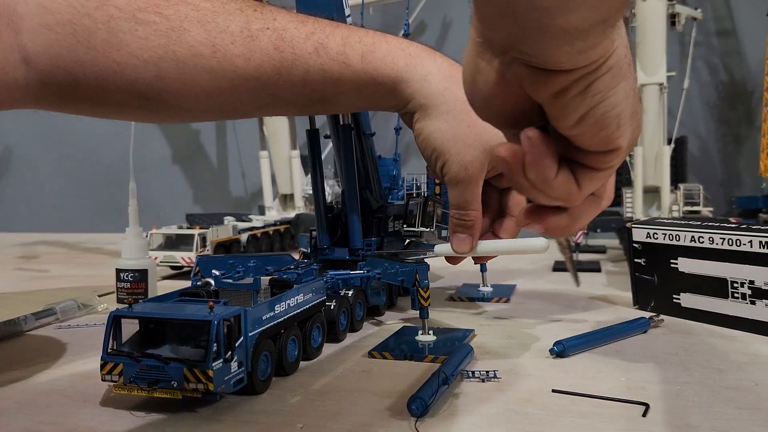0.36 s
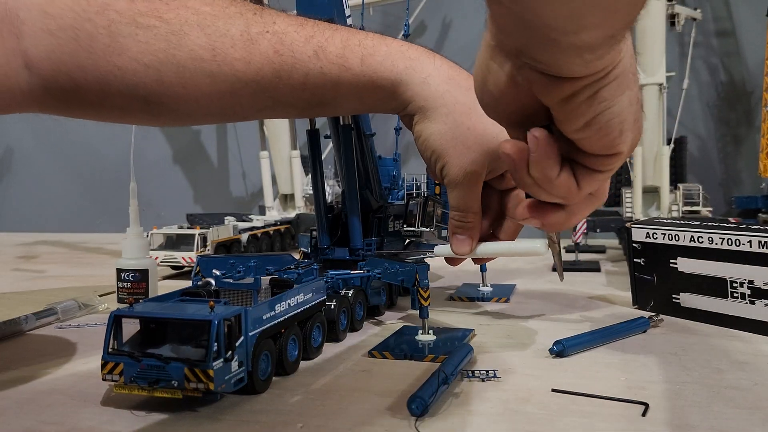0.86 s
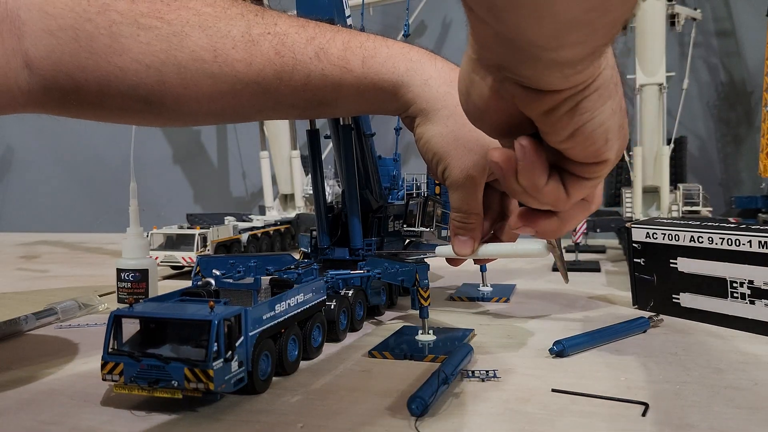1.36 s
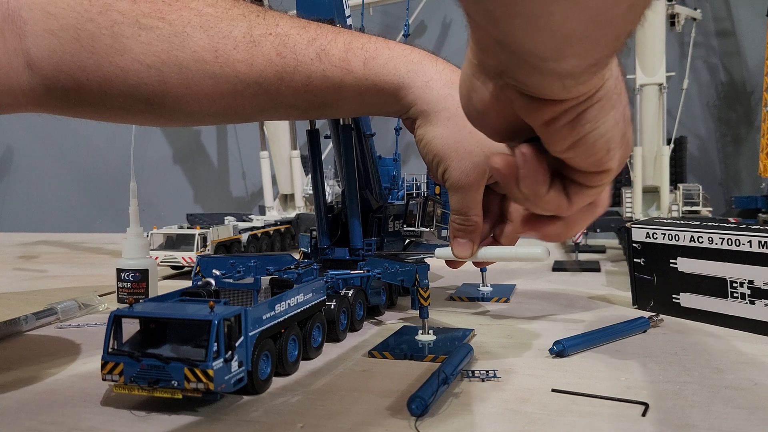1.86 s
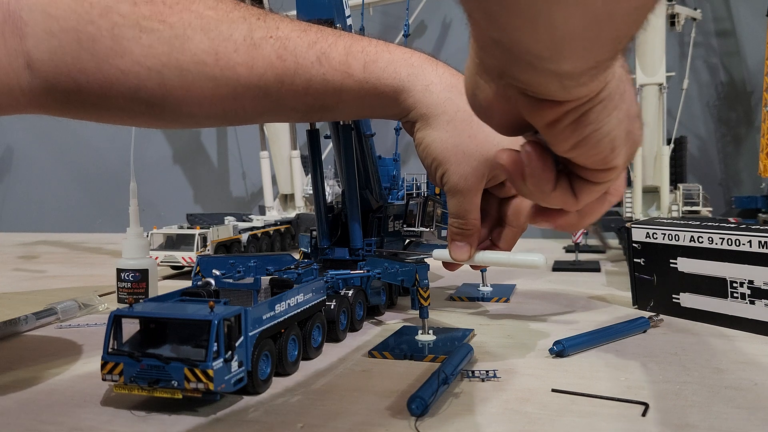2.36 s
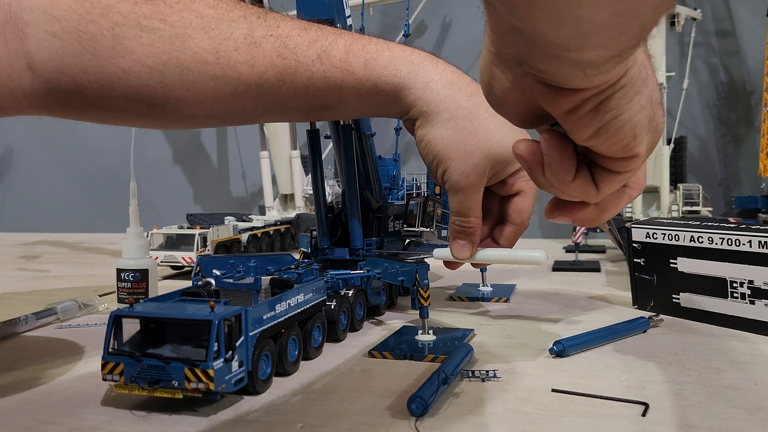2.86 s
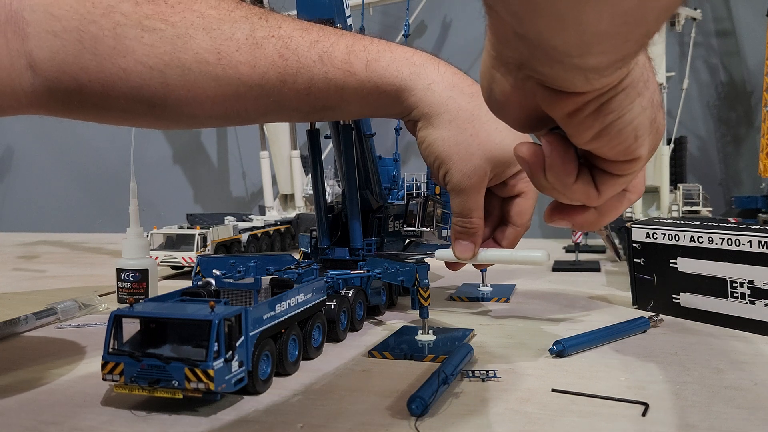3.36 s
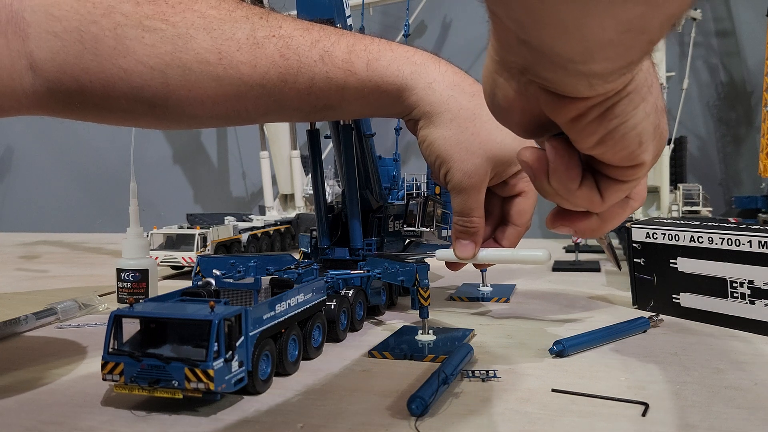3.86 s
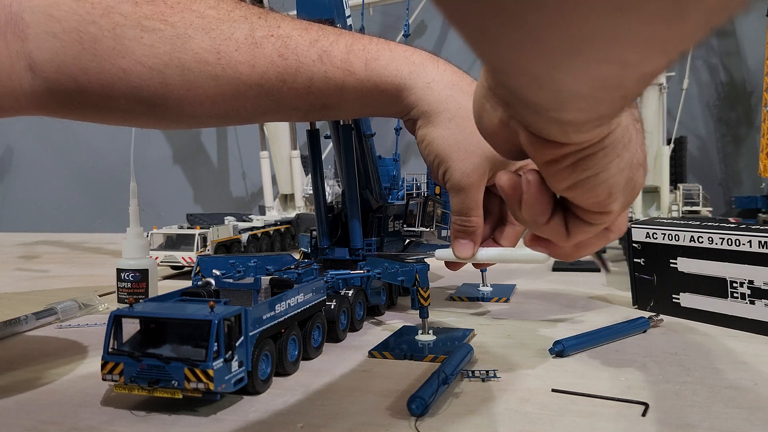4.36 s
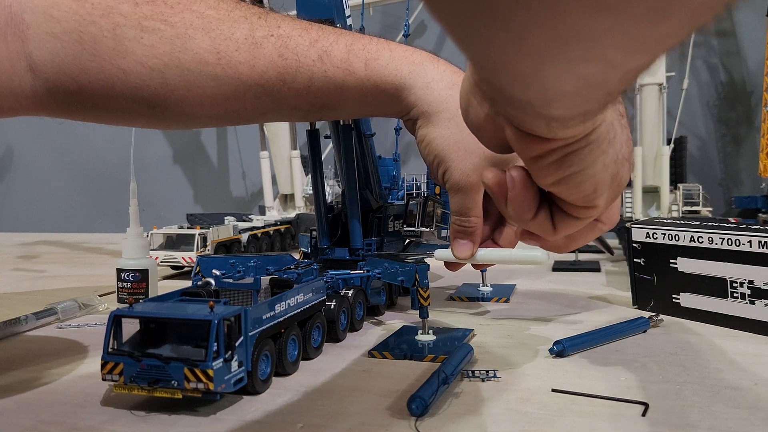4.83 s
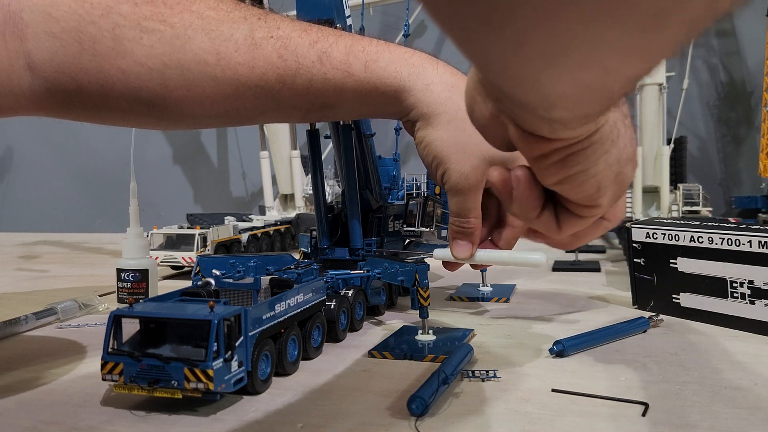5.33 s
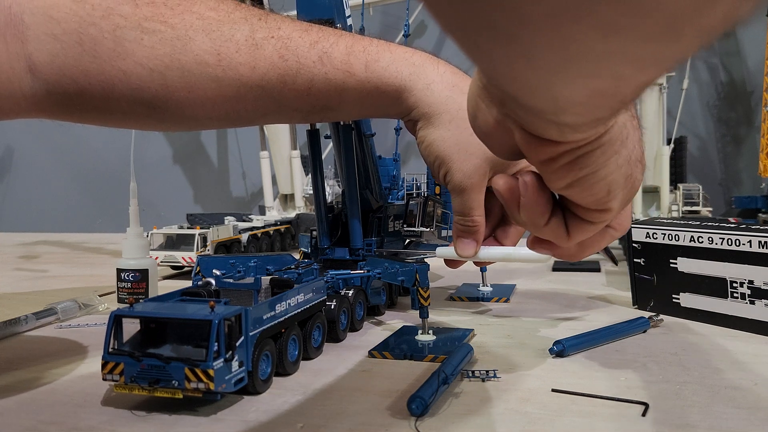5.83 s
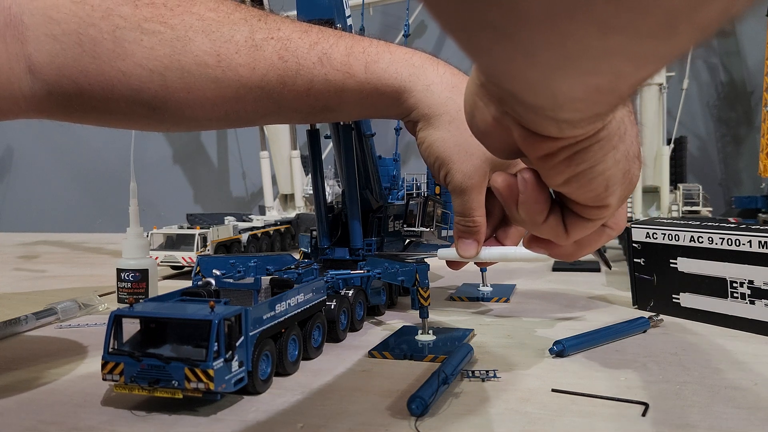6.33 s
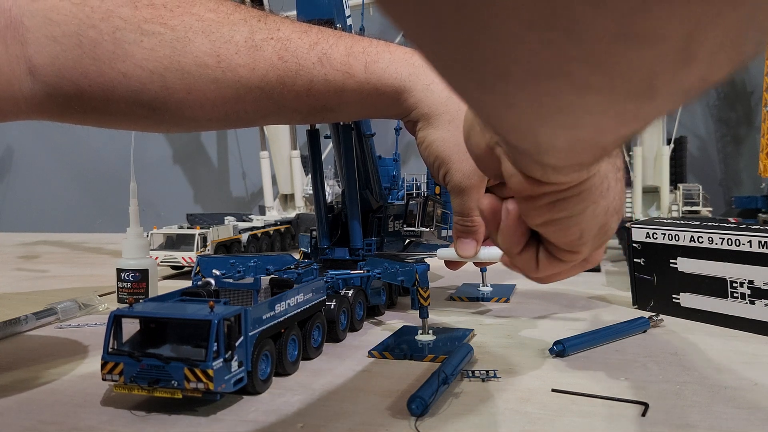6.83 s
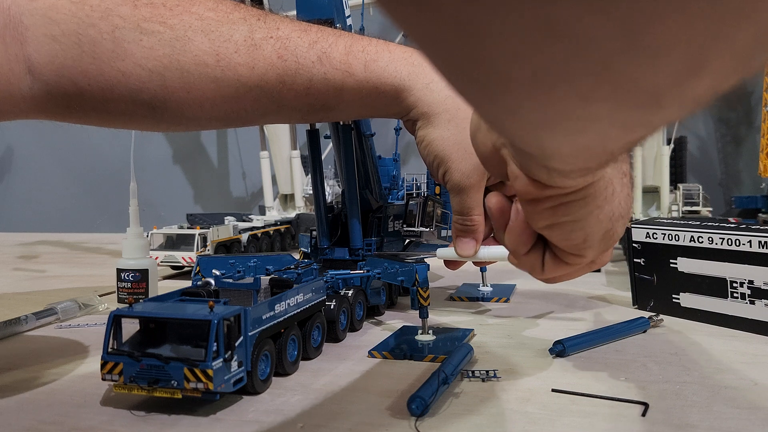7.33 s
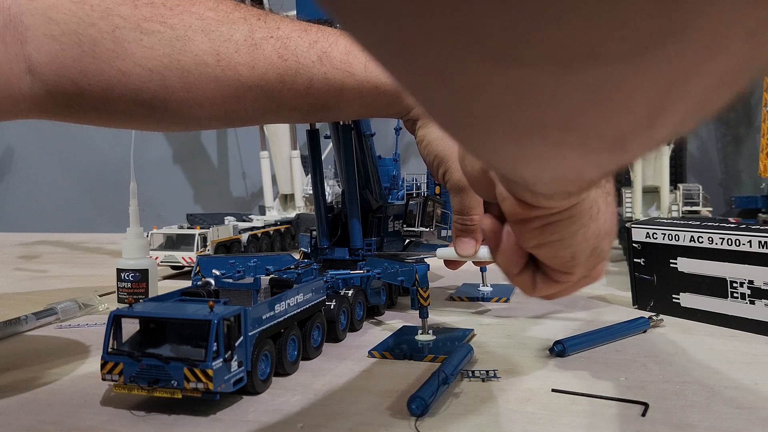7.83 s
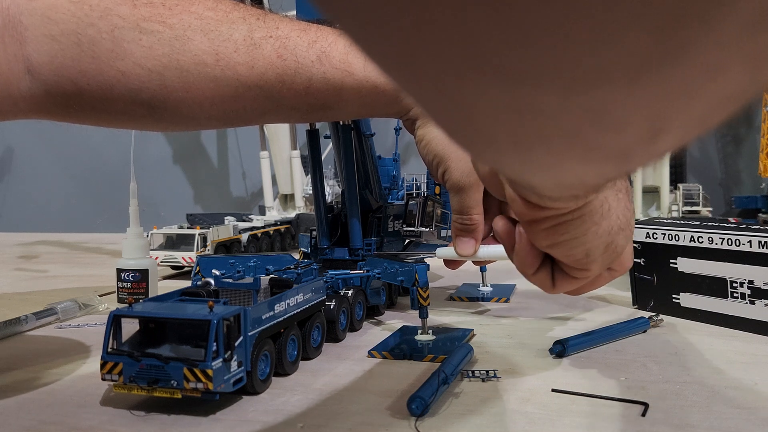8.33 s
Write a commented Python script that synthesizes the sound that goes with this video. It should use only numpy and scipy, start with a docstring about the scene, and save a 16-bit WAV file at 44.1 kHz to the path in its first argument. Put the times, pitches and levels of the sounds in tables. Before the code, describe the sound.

Light hammering on a small metal pin, recorded near in a reverberant workshop. Dry, bright clicks with a short metallic rattle and soft woody thud come in runs about a fifth of a second apart, separated by near-quiet gaps with tiny contact ticks. Low drifting room drone and thin hiss lie far below. The last two blows are firm and heavy.

```python
"""Distant rumble, drone and faint hiss come first and lie below everything, as drifting bands of noise.
Then a small steel tool touches and scuffs the parts of a die-cast model: light ticks ring nearby modes.
Soon it taps a metal pin into the model's mount: each blow rattles for a few milliseconds, rings the metal
and thumps the bench, whose low modes swell. Half a second of dense echoes from the workshop answers.
Runs of blows and light contacts go on by turns until the end."""
import sys
import numpy as np
from scipy import signal
from scipy.fft import rfft, irfft, next_fast_len
from scipy.io import wavfile

SR = 44100
rng = np.random.default_rng(int(sys.argv[2]) if len(sys.argv) > 2 else 0)


def master_out(mix):
    """Clip the mix to full scale and print it as 16-bit PCM to the path in sys.argv[1]."""
    frames = np.transpose(np.atleast_2d(mix))
    ceiling = np.clip(frames, -1, 1)
    pcm = np.round(ceiling * 32767).astype(np.int16)
    wavfile.write(sys.argv[1], SR, pcm)


def field_ratio(decibels):
    """Amplitude ratio for a level in dB (20 dB per decade); scalars and array-likes work."""
    return 10 ** (np.asarray(decibels, dtype=float) / 20)


N = 372204
CONTACT_SAMPLES = 4096   # room for the sound of one contact
WAYS = 5   # directions of radiation: two toward the microphones, the others toward the walls


def rms_one(x, count=None):
    """Scales the last two axes together to rms 1 over the first samples."""
    return x / np.sqrt(np.mean(x[..., :count] ** 2, axis=(-1, -2), keepdims=True) + 1e-20)


def at_hz(points, hz, axis=1):
    """Reads a column of a table along log frequency."""
    points = np.array(points)
    return np.interp(np.log(hz), np.log(points[:, 0]), points[:, axis])


def ring(push, hz, t60):
    """A two-pole resonator: a unit click sets a dying sine of starting height 1 ringing."""
    radius = field_ratio(-60 / (t60 * SR))
    turn = 2 * np.pi * hz / SR
    return signal.lfilter([0, np.sin(turn)], [1, -2 * radius * np.cos(turn), radius * radius], push + 1e-18)


def band(x, low_hz, high_hz):
    """Butterworth band-pass."""
    edges_hz = [low_hz, min(high_hz, .45 * SR)]
    return signal.sosfilt(signal.butter(2, edges_hz, "band", fs=SR, output="sos"), x)


def drift(quickness):
    """Smoothed chance with a spread of 1; a higher quickness makes it wander faster."""
    knots = rng.standard_normal(int(N / SR * 40))
    slow = signal.lfilter([1], [1, -np.exp(-quickness / 6.4)], knots)
    return np.interp(np.arange(N) / SR * 39, np.arange(len(slow)), slow / slow.std())


# how alike left and right are: (f/Hz, likeness; below 0 counts as 0)
LEFT_RIGHT_LIKENESS = [(60, 0.985), (130, 0.95), (240, 0.5), (500, 0.5), (950, 0.15), (3770, -0.22),
                       (15000, -0.04)]


def stereo_noise(mid, side, hz):
    """Two independent noises make a left-right pair, as alike as the table says at this frequency."""
    alike = np.clip(at_hz(LEFT_RIGHT_LIKENESS, hz), 0, 1)
    return np.sqrt(1 + alike) * mid + np.sqrt(1 - alike) * side * [[1], [-1]]


# background tone color, relative within each layer: (f/Hz, level/dB per Hz)
AIR_SPECTRUM = [(25, -5), (80, -1.5), (124, -6), (250, -26.5), (389, -9), (687, -25.5), (1120, -30.5),
                (3150, -36), (6000, -40.5), (8300, -39.5), (9500, -47), (15200, -47), (16500, -52)]
# how busy the background is, as the level of its drone: (t/s, level/dB)
DRONE_LEVEL = [(0, -74), (.35, -71), (.8, -74.5), (2.6, -71), (2.9, -76), (3.3, -79.5), (3.55, -73.5),
               (4.1, -77), (5.65, -80), (5.9, -73), (6.15, -78), (6.8, -79), (8.44, -73.5)]
# brief swells of the boom: (t/s, rise in level/dB)
BOOM_SWELLS = [(2.82, 9), (3.35, 6), (5.9, 10), (6.45, 4.5)]


def background():
    """Third-octave noise bands flicker; the boom swells now and then, drone and hiss rise together."""
    rumble_db, boom_db, hiss_db = -65.5, -75, -79.5
    hiss_follows = 0.7   # dB per dB of drone
    swell_s, patchy_db = 0.13, 4.5
    t = np.arange(N) / SR
    drone_db = np.interp(t, *np.transpose(DRONE_LEVEL))
    boom_db = boom_db + sum(rise * np.exp(-((t - s) / swell_s) ** 2) for s, rise in BOOM_SWELLS)
    hiss_db = hiss_db + hiss_follows * (drone_db - drone_db.mean())
    levels = [rumble_db, boom_db, drone_db, hiss_db]
    white = rng.standard_normal((2, 2, N))
    edges = 25 * 2 ** np.arange(0, 9.4, 1 / 3)
    layers = [0, 0, 0, 0]
    for k, (low, high) in enumerate(zip(edges, edges[1:])):
        hz = np.sqrt(low * high)
        mid, side = band(white[k % 2], low, high)
        flicker_db = patchy_db * (hz / 100) ** -.3 * drift(4.9)   # the lows wander most
        layer = int(hz > 105) + int(hz > 250) + int(hz > 800)
        layers[layer] = layers[layer] + stereo_noise(mid, side, hz) * field_ratio(at_hz(AIR_SPECTRUM, hz) + flicker_db)
    mix = sum(rms_one(layer) * field_ratio(db) for layer, db in zip(layers, levels))
    return mix * field_ratio([[.5], [-.5]])   # a touch to the left


def port_hiss():
    """The microphone port gathers steady hiss around its resonance, independent left and right."""
    low_hz, high_hz, level_db = 6900, 8400, -85.5
    hiss = band(rng.standard_normal((2, N)), low_hz, high_hz)
    return field_ratio(level_db) * rms_one(band(hiss, low_hz, high_hz))   # twice through for steeper sides


def rattle(length_s, spiky_db, alike, settle_db):
    """Tool, pin and loose parts chatter: uneven clicks, then a fainter settling."""
    t = np.arange(CONTACT_SAMPLES) / SR
    spikes_db = spiky_db * rng.standard_normal((len(length_s), 1, CONTACT_SAMPLES))
    clicks = rng.standard_normal((len(length_s), WAYS + 1, CONTACT_SAMPLES)) * field_ratio(spikes_db)
    # the two microphones share part of the clicks; the walls get their own
    share = np.clip(alike, 0, 1)
    clicks[:, :2] = np.sqrt(share) * clicks[:, -1:] + np.sqrt(1 - share) * clicks[:, :2]
    contact = np.exp(-(t / np.abs(length_s)[:, None, None]) ** 1.6)
    settling = field_ratio(settle_db) * np.exp(-t / 0.018 - (t / 0.019) ** 4)   # comes to rest rather suddenly
    onset = 1 - np.exp(-t / 0.00039)
    return clicks[:, :WAYS] * onset * (contact + settling)


def place(times, sounds, lag=0):
    """Lays each sound at its time; the right microphone hears it lag samples later."""
    out = np.zeros((WAYS, N + CONTACT_SAMPLES))
    for s, sound in zip(times, sounds):
        start = round(s * SR)
        out[:, start:start + CONTACT_SAMPLES] += sound * np.linspace(1, 0, CONTACT_SAMPLES)
    out[1] = np.roll(out[1], lag)
    return out[:, :N]


# modes of model, mount and pin: (f/Hz, relative level/dB, t60/s)
METAL_MODES = [(436, -4, 0.07), (470, -2, 0.02), (570, 0, 0.062), (674.3, -7, 0.11), (854, 3.5, 0.046),
               (1020, -10, 0.036), (1053, -7, 0.091), (1235, -4, 0.054), (1390, -4, 0.04), (1640, 0, 0.031),
               (2026, 1, 0.028), (2100, -4.5, .06), (2140, -11.5, 0.27), (2296, -3.5, .05),
               (2660, -15, 0.055), (3020, -6.5, .018), (3800, -2, .015), (4040, -2, .012), (4400, 1, 0.025),
               (4800, 0, .015), (5500, -5.5, 0.013), (5710, -7, .015), (6400, -3, 0.04), (6780, -3.5, .02),
               (7250, -1, .015), (7780, -17.5, .015), (9700, -16.5, 0.0055), (13300, -5.5, 0.0027),
               (15000, -8, 0.005)]


def rung(chatter, strengths_db, low, high):
    """Chatter drives the metal modes from low up to high, each with a strength of its own."""
    total = 0
    for k, (hz, db, t60) in enumerate(METAL_MODES):
        if low <= hz < high:
            total = total + field_ratio(db + strengths_db[:, k]) * ring(chatter, hz, t60)
    return rms_one(total, count=400)


# light contacts and rebounds: (t/s, tick level/dB, body level/dB, body f/Hz, left-right level/dB)
LIGHT_CONTACTS = [(.355, -85, -75.5, 1480, 15), (1.195, -92, -75, 1160, 5), (2.281, -45.5, -32, 1567, -0.5),
                  (2.549, -53.5, -64, 2500, -3.5), (2.636, -59, -75, 2200, 3), (2.696, -68, -57.5, 393, 14),
                  (3.066, -75, -78, 2000, 10), (3.288, -71, -77.5, 1300, 3), (3.469, -63.5, -83.5, 2500, 1),
                  (3.54, -70, -70.5, 2100, 7), (3.652, -63, -45.5, 1800, 2), (3.848, -79.5, -86, 1200, -1),
                  (5.261, -38.5, -28, 1700, -3), (5.737, -77.5, -70.5, 1750, 11),
                  (5.979, -71.5, -72, 1200, 11), (6.033, -77, -66.5, 1520, 7.5),
                  (6.261, -79, -55, 1400, 10), (6.424, -57, -47.5, 2240, 5)]


def touches():
    """A light contact ticks and mainly rings the modes near the spot it meets."""
    shortest_s, scuff_s_per_db, scuff_below_db = 0.0046, 0.0013, -60   # fainter contacts drag on as scuffs
    s, tick_db, body_db, body_hz, pan_db = np.transpose(LIGHT_CONTACTS)
    faintness_db = np.clip(scuff_below_db - np.maximum(tick_db, body_db), 0, None)
    length_s = shortest_s + scuff_s_per_db * faintness_db
    chatter = rattle(length_s, spiky_db=7.0, alike=1.0, settle_db=-17)
    chance_db = rng.standard_normal((len(s), len(METAL_MODES), 1, 1))
    tick = rung(chatter, 3 * chance_db, 4000, 9000)
    tick = tick + .8 * rms_one(band(chatter, 4000, 10000), count=400)   # the bare chatter
    octaves = np.log2(np.array(METAL_MODES)[:, 0] / body_hz[:, None])
    nearness_db = -20 * octaves[:, :, None, None] ** 2
    body = rung(chatter, nearness_db + 2 * chance_db, 0, 4000)
    body = np.array([band(row, hz / 2.2, hz * 1.5) for row, hz in zip(body, body_hz)])
    sounds = field_ratio(tick_db)[:, None, None] * band(tick, 4100, 15500) + field_ratio(body_db)[:, None, None] * body
    sounds[:, :2] *= field_ratio(np.outer(pan_db, [.5, -.5]))[:, :, None]
    return place(s, sounds)


# workshop tail: (f/Hz, relative level/dB, t60/s)
ROOM_TAIL = [(100, -10.5, .45), (250, -5, 0.45), (400, 1, .55), (534, 1.5, .6), (900, -2, .6),
             (1550, -7.5, 0.52), (3000, -8, .56), (6000, -7, .52), (8920, -7.5, 0.43), (12000, -7.5, 0.21),
             (16000, -9, 0.17)]


def workshop(ways):
    """Each way meets its own walls: dense echoes build up after the first walls answer, die band by band."""
    size = 32768
    t = np.arange(size) / SR
    edges = 50 * 2 ** np.arange(0, 8.6, .5)
    echo = 0
    for low, high in zip(edges, edges[1:]):
        hz = np.sqrt(low * high)
        mid, side = band(rng.standard_normal((2, len(ways), 1, size)), low, high)
        t60 = at_hz(ROOM_TAIL, hz, axis=2)
        dying = field_ratio(at_hz(ROOM_TAIL, hz) - 60 * t / t60)
        evened = np.sqrt(len(ways) * t60 * SR / 7)   # offsets tail length and number of ways
        echo = echo + stereo_noise(mid, side, hz) * dying / evened
    build = 1 - np.exp(-(t / .025) ** 2.0)
    total = next_fast_len(N + size)
    spectrum = rfft(ways[:, None], total) * rfft(echo * build, total)
    return irfft(spectrum.sum(axis=0), total)[:, :N]


# blows: (t/s, push level/dB: weight into the model, mount level/dB: ring of the seat,
#         snap level/dB: hardness of steel on pin)
BLOWS = [(0.8831, -33.5, -37, -45), (1.3744, -31, -33.5, -36), (1.6132, -29.5, -31, -32.5),
         (1.8418, -27, -27.5, -31), (2.058, -26.5, -27.5, -27), (2.2694, -34, -23, -20),
         (4.2798, -37, -34.5, -42), (4.4882, -28, -27.5, -28.5), (4.6999, -28, -21.5, -24),
         (5.253, -33, -24.5, -27), (7.1034, -30, -33, -36.5), (7.48, -38.5, -48, -64),
         (7.874, -25, -29, -26.5), (8.1853, -24.5, -28, -26)]


def blow_parts():
    """The bench follows the push of each blow, the crack follows its snap."""
    middling_db = -30
    s, push_db, mount_db, snap_db = np.transpose(BLOWS)
    bench_db = -35.5 + 1.25 * (push_db - middling_db)
    crack_db = -37.5 + 1.2 * (snap_db - middling_db)
    return s, bench_db, push_db, mount_db, snap_db, crack_db


# knock, mount, pin and crack lie between these: (f/Hz)
PART_EDGES = [430, 1500, 4000, 9000, 16000]
# how much later each part reaches the right microphone: (delay/samples)
PART_LAGS = [9, -3, 1, -1]


def taps():
    """Hard blows on the pin: modes ring under audible bare chatter, with a dull thud below."""
    bare_db, thud_db = 4.0, -6.0   # against the ringing modes; against the bench level
    shortest_s, longer_s_per_db, hardest_db = 0.0023, 0.00021, -20   # softer snaps stay longer in contact
    s, bench_db, knock, mount, pin, crack = blow_parts()
    length_s = shortest_s + longer_s_per_db * np.clip(hardest_db - pin, 0, None)
    chatter = rattle(length_s, spiky_db=2.5, alike=0.39, settle_db=-8.5)
    strengths_db = 3 * rng.standard_normal((len(s), len(METAL_MODES), WAYS, 1))
    thud = rms_one(band(chatter, 220, 450), count=400)
    out = place(s, field_ratio(bench_db + thud_db)[:, None, None] * thud)
    parts_db = [knock, mount, pin, crack]
    for low, high, db, lag in zip(PART_EDGES, PART_EDGES[1:], parts_db, PART_LAGS):
        bare = rms_one(band(chatter, low, high), count=400)
        part = rung(chatter, strengths_db, low, high) + field_ratio(bare_db) * bare
        part = band(part, .85 * low, 1.15 * high)   # each part keeps to its range
        out = out + place(s, field_ratio(db)[:, None, None] * rms_one(part, count=400), lag)
    return out * field_ratio([[1.1], [-1.1], [0], [0], [0]])   # the pin sits a little to the left


# modes of the bench top: (f/Hz, relative level/dB, t60/s, swell/s as the t60 of what holds back the onset)
BENCH_MODES = [(67, -9, 0.9, .12), (87, -2, .45, 0.06), (103, -8, .3, 0.18), (113, -4, 0.45, .08),
               (155, -3, .6, 0.025), (158.2, -9, 0.6, 0.025), (183, -8.5, 0.4, .04),
               (215, -20.5, 0.75, .03), (266, -22, 0.45, 0.057), (295, -17, .5, 0.071),
               (345, -17, 0.35, .02), (390, -17, .3, 0.011)]


def bench():
    """Each blow thumps the bench: each low mode swells in before it dies."""
    hold_s, drop_s, drop_db = 0.11, 0.012, -8   # the thump holds, then drops rather suddenly
    s, bench_db, *_ = blow_parts()
    strengths = field_ratio(bench_db[:, None] + 2 * rng.standard_normal((len(s), len(BENCH_MODES))))
    out = np.zeros(N)
    for k, (hz, db, t60, swell) in enumerate(BENCH_MODES):
        push = np.zeros(N)
        push[np.round(s * SR).astype(int)] = strengths[:, k] * field_ratio(db)
        out += ring(push, hz, t60) - ring(push, hz, min(swell, t60))
    t = np.arange(N) / SR
    since_blow = t - s[np.clip(np.searchsorted(s, t) - 1, 0, None)]
    return out * field_ratio(drop_db * (.5 + .5 * np.tanh((since_blow - hold_s) / drop_s)))


def scene():
    """Blows and touches, their tail in the room, the background."""
    ways = taps() + touches() + bench()
    return ways[:2] + workshop(ways[2:]) + background() + port_hiss()


def top_cut(x):
    """Nothing passes above the cut-off."""
    return signal.sosfilt(signal.butter(12, 16810, fs=SR, output="sos"), x)


def record(dry):
    """The microphones lose the deepest bass, dip above their port resonance and end steeply near 16 kHz."""
    dry = signal.sosfilt(signal.butter(2, 42, "high", fs=SR, output="sos"), dry)
    dry = dry - 0.7 * signal.lfilter(*signal.iirpeak(10000, 4.0, fs=SR), dry)
    dry = signal.sosfilt(signal.cheby2(16, 30, 16100, fs=SR, output="sos"), dry)
    return top_cut(dry)


dry = scene()
out = record(dry)
master_out(out)
```